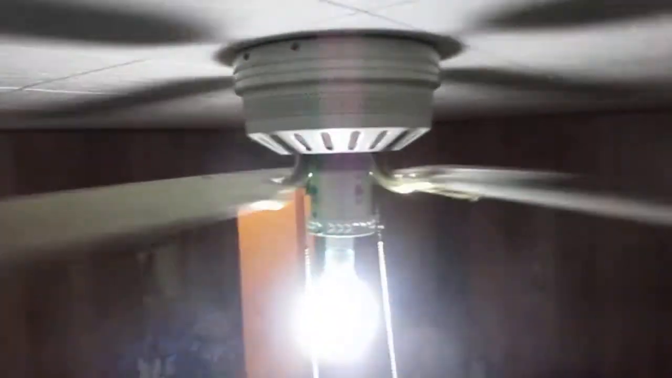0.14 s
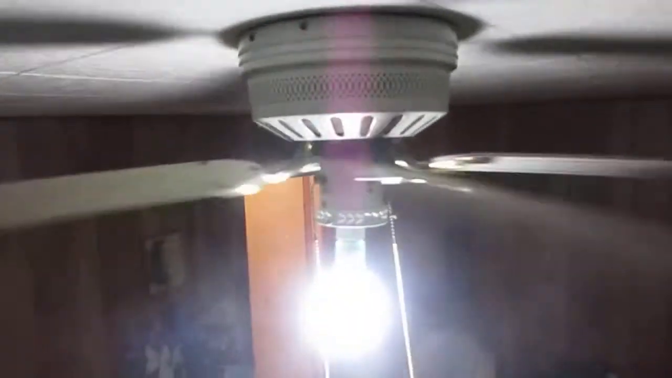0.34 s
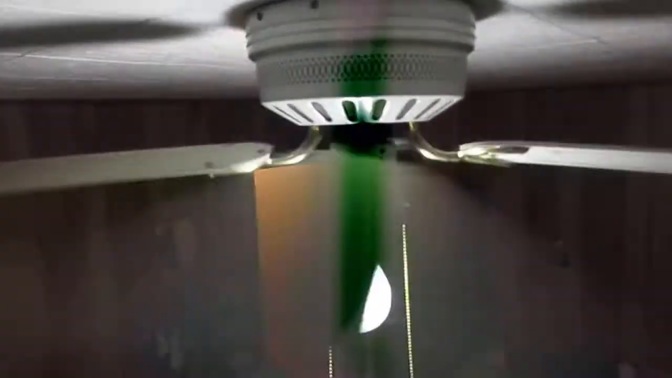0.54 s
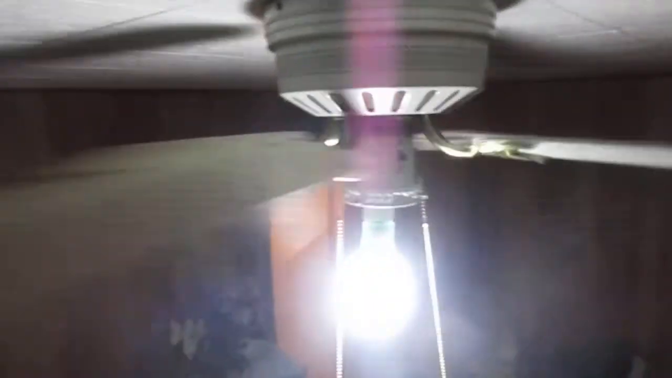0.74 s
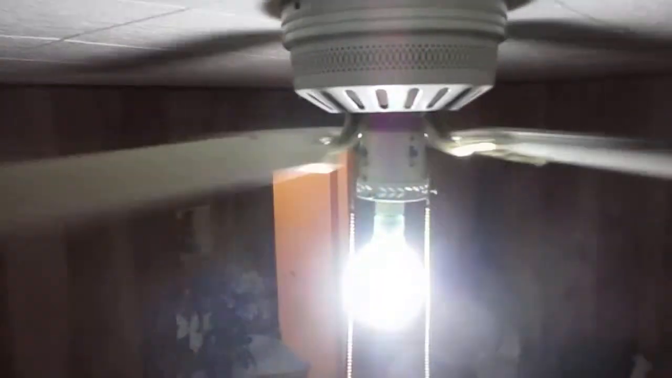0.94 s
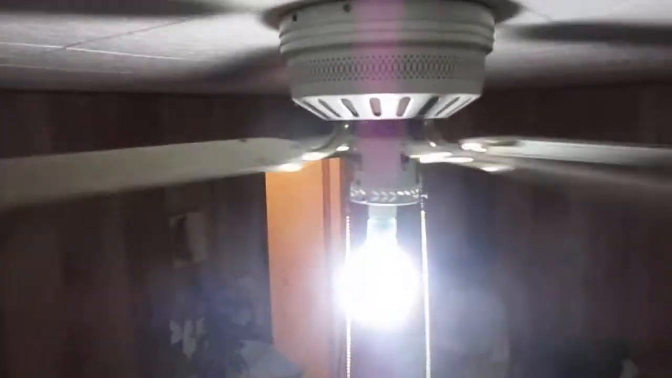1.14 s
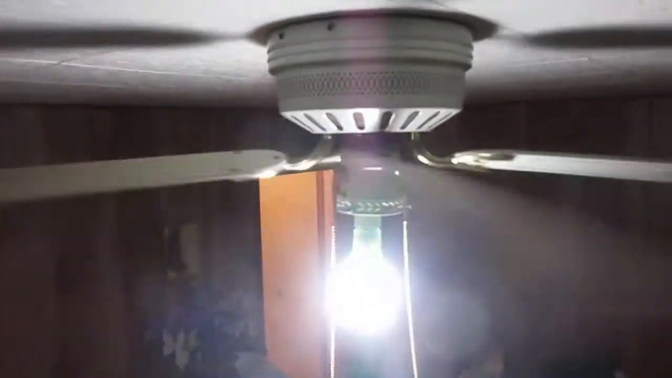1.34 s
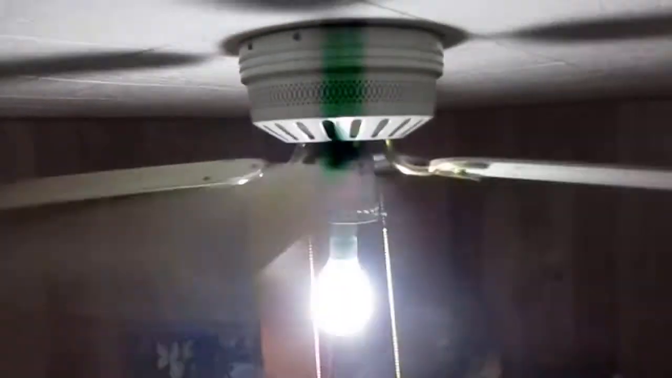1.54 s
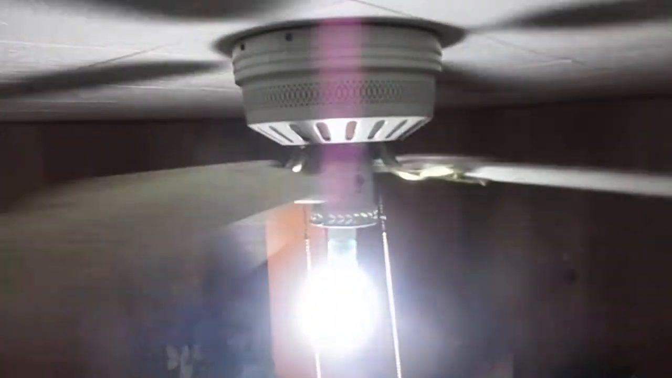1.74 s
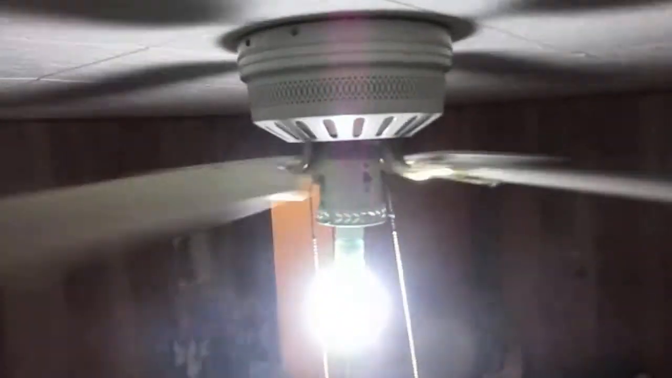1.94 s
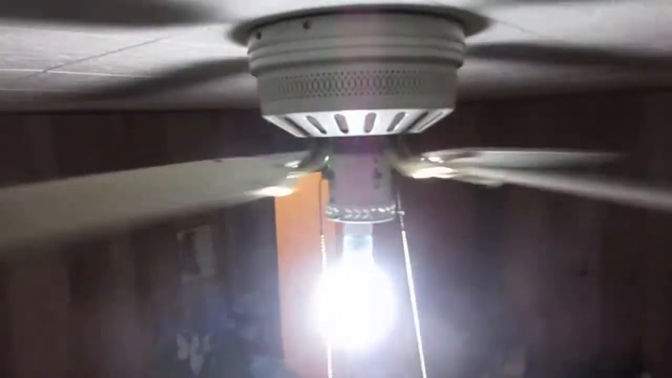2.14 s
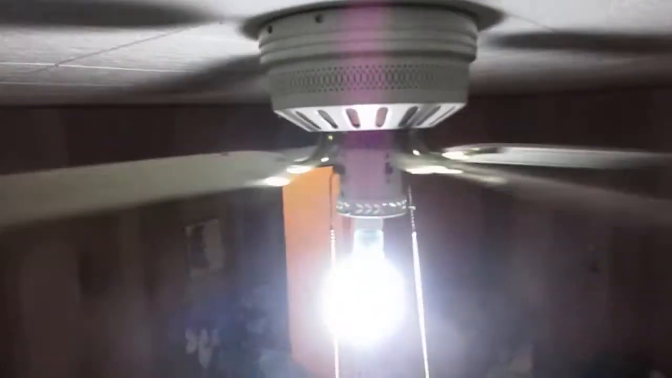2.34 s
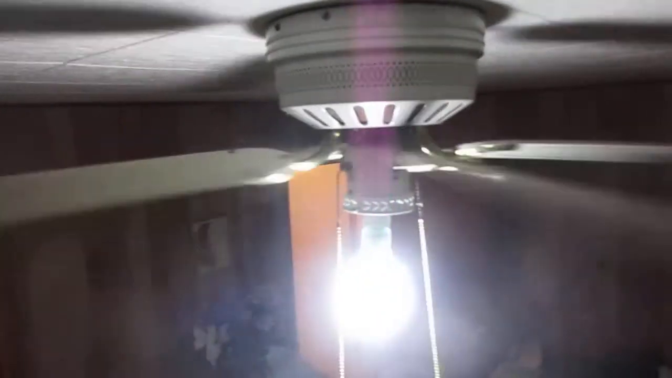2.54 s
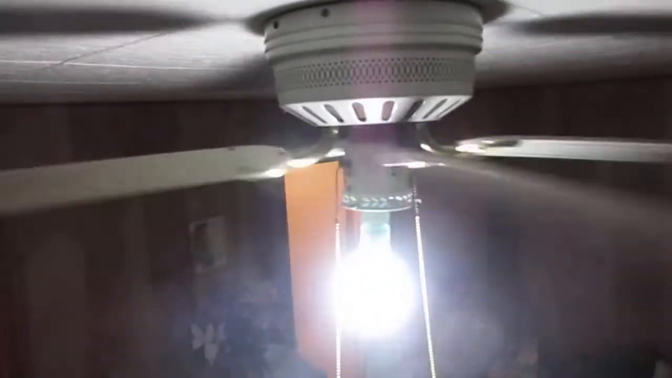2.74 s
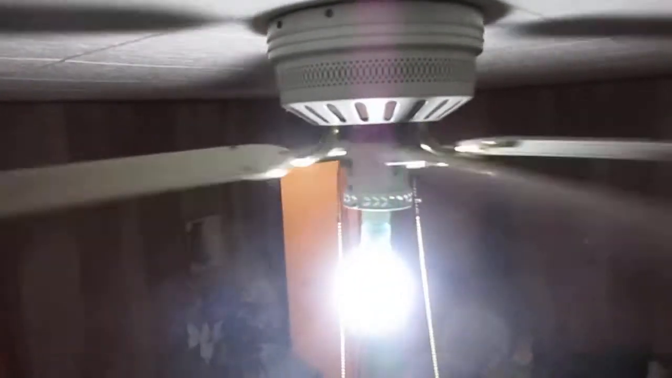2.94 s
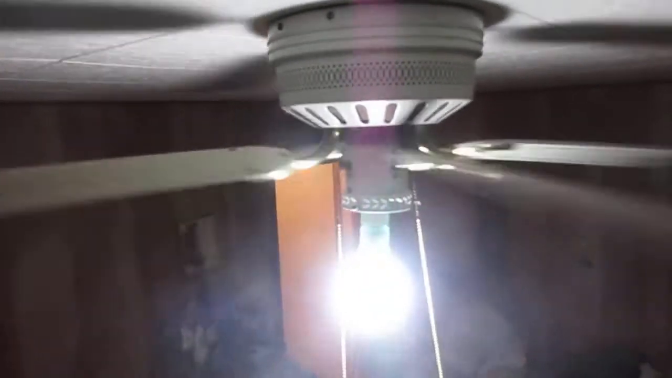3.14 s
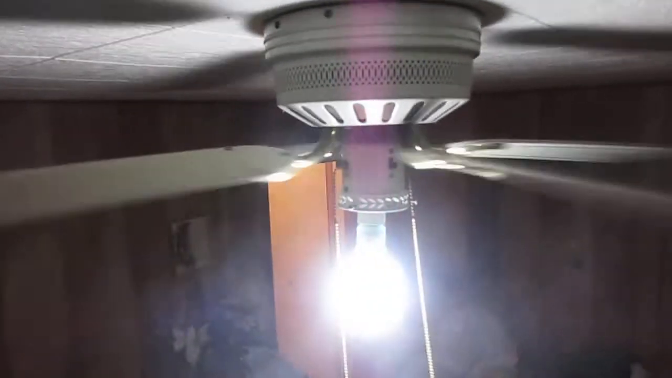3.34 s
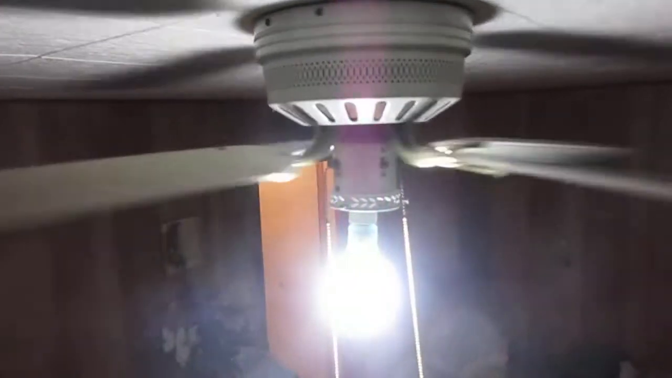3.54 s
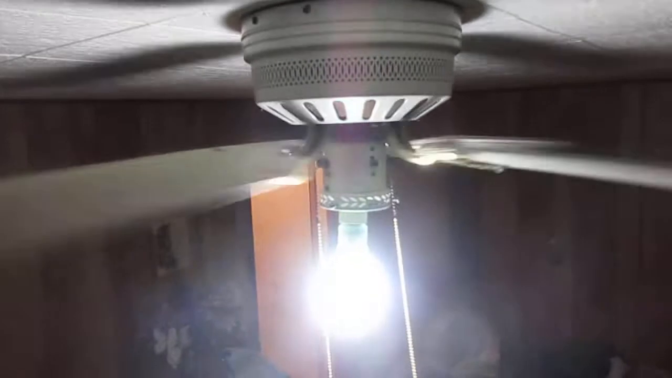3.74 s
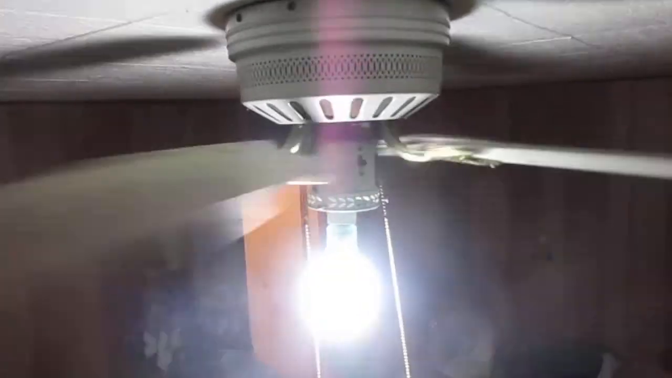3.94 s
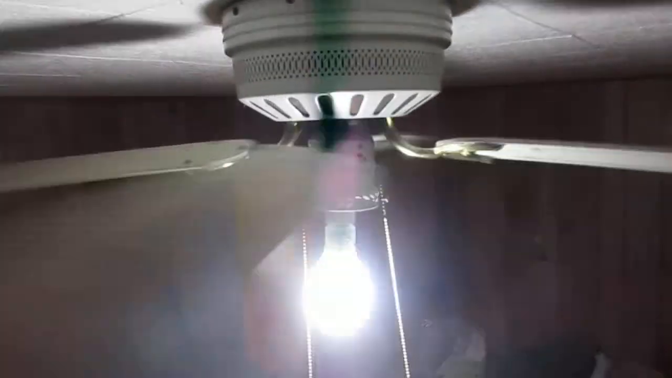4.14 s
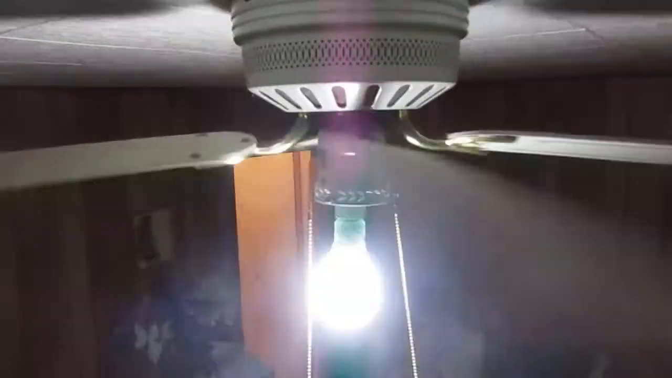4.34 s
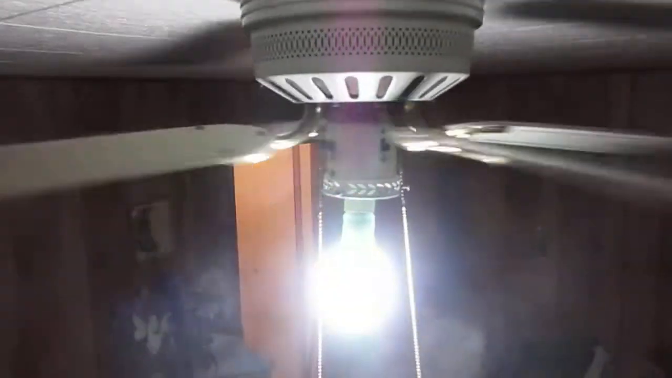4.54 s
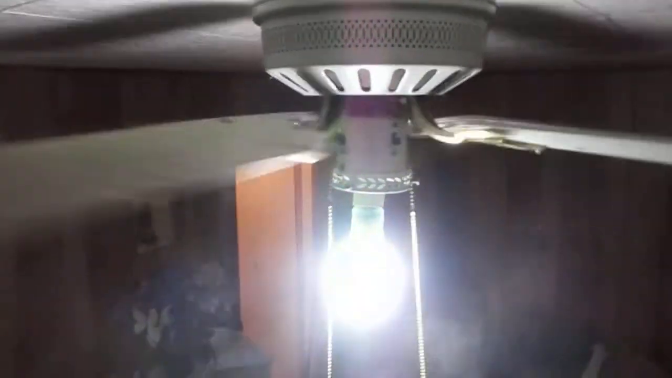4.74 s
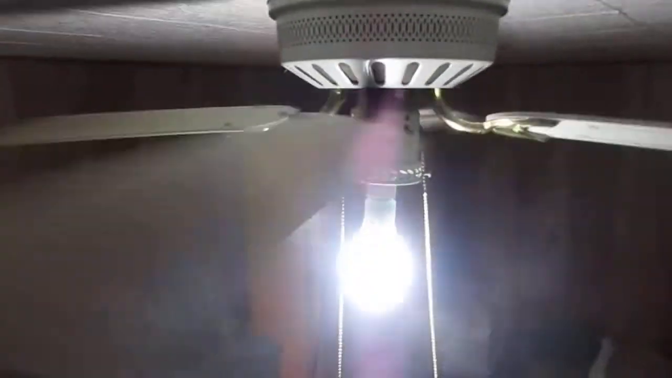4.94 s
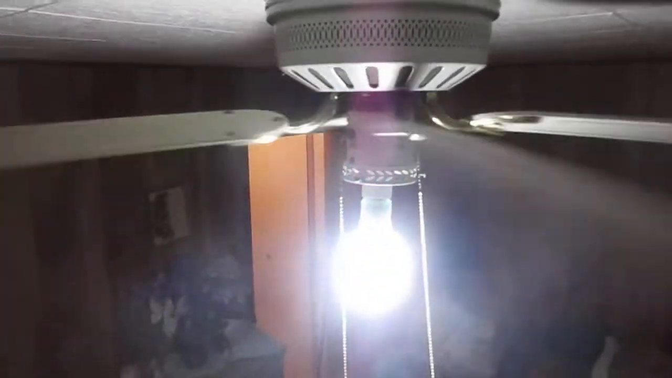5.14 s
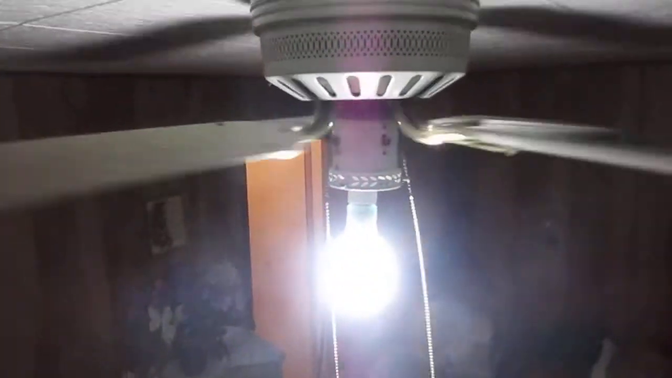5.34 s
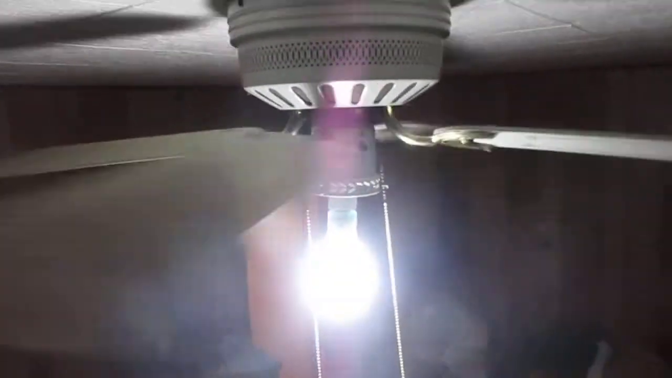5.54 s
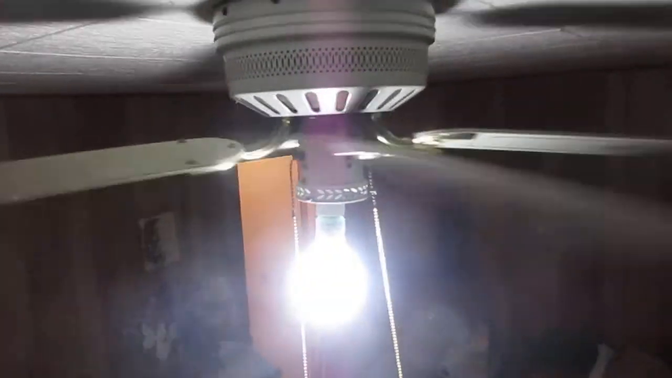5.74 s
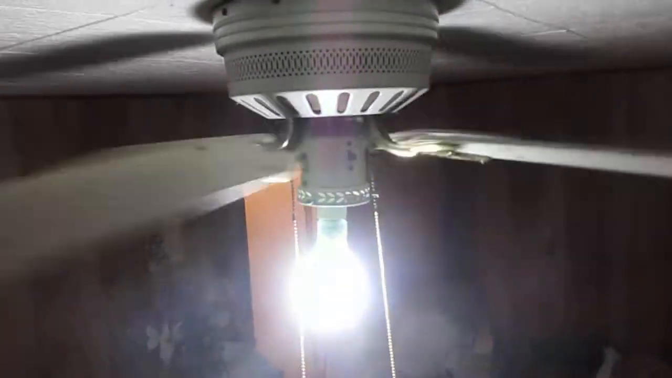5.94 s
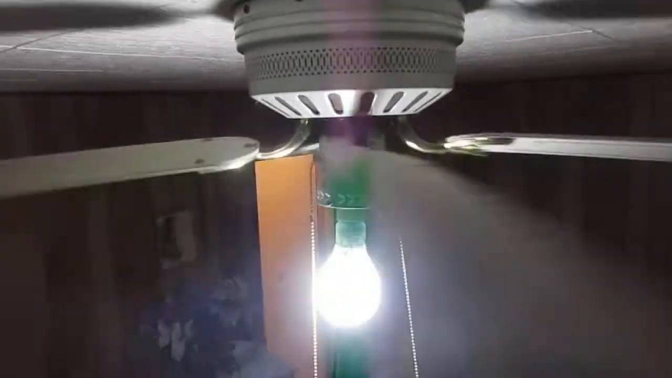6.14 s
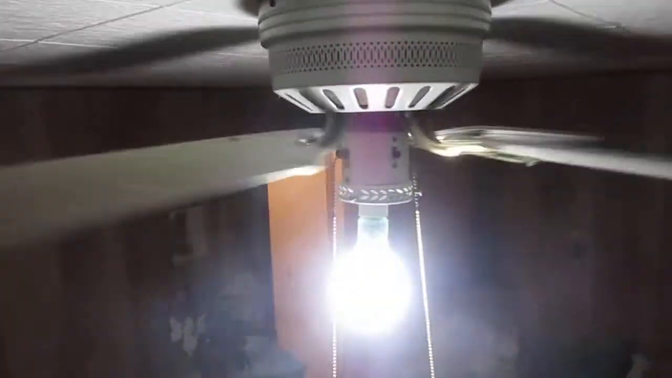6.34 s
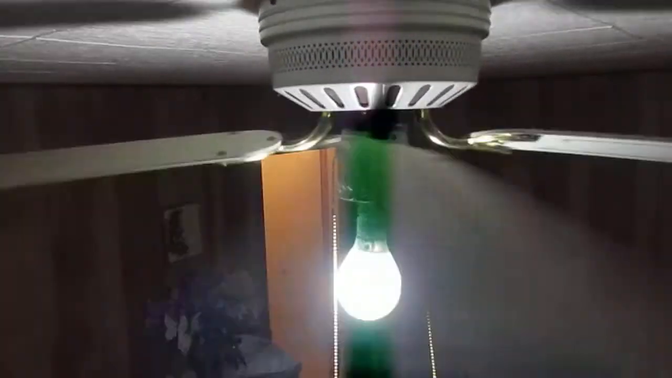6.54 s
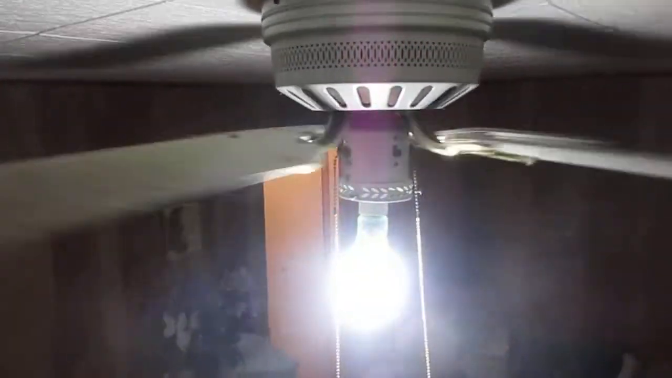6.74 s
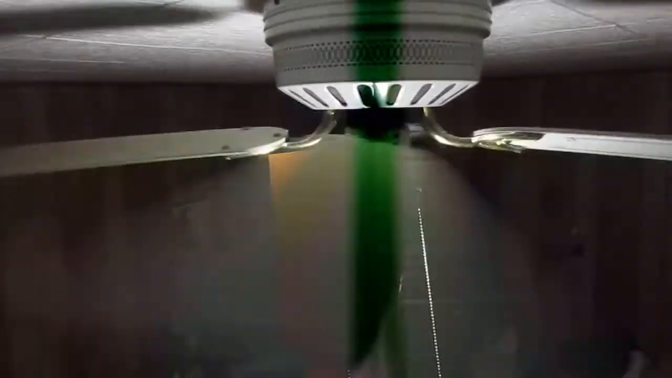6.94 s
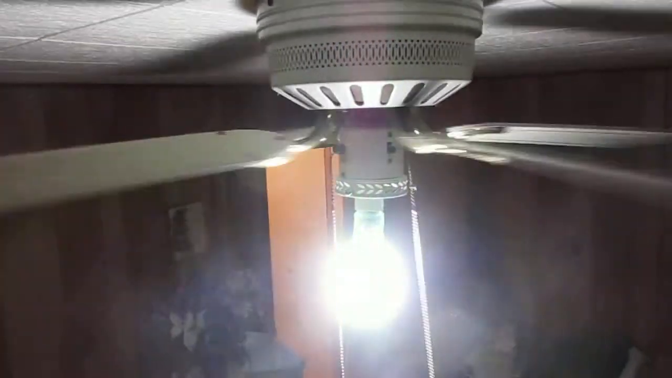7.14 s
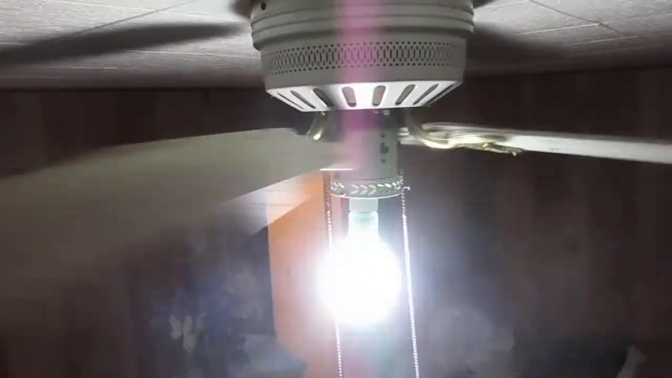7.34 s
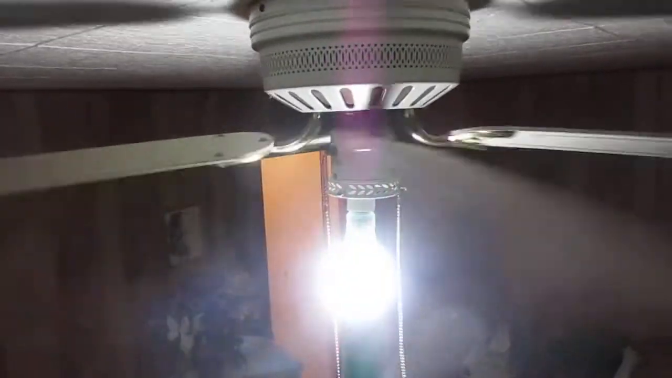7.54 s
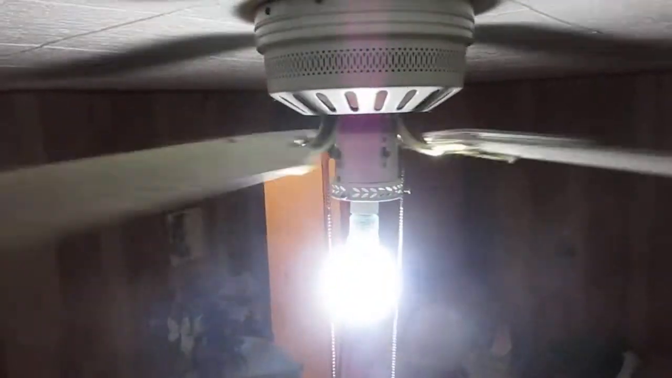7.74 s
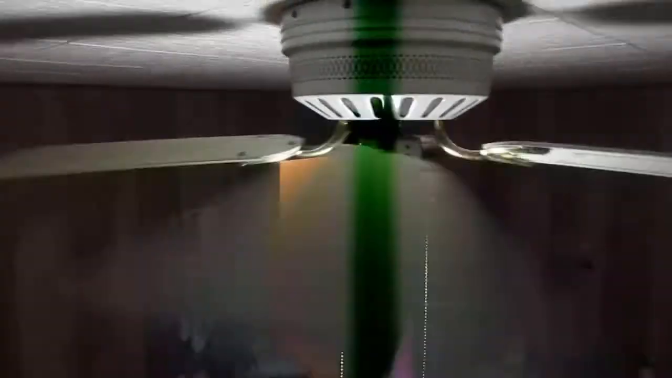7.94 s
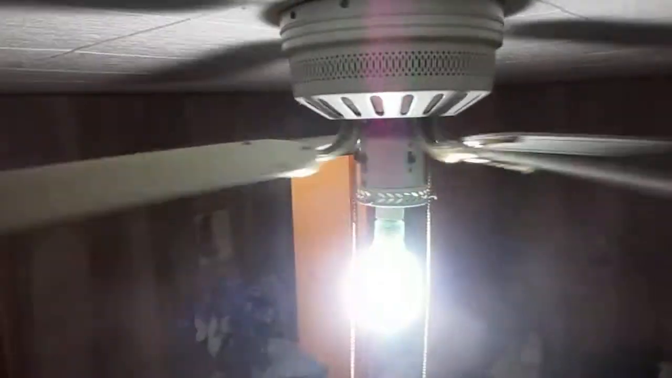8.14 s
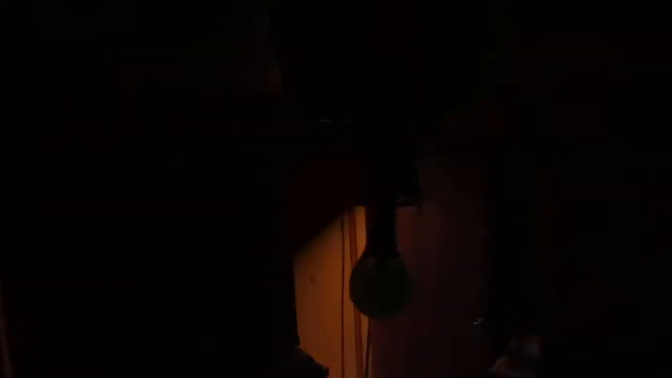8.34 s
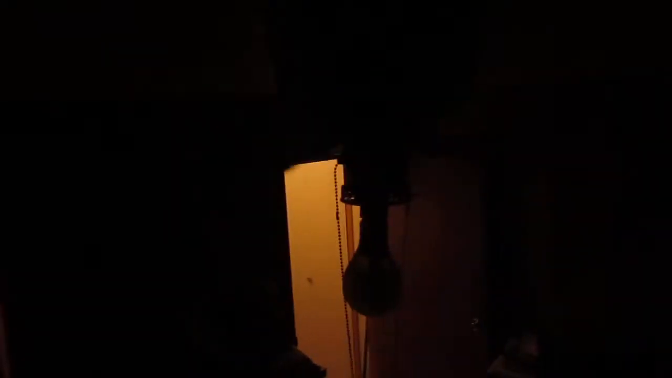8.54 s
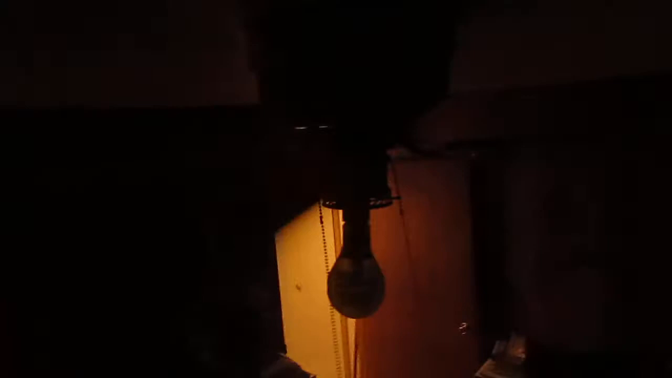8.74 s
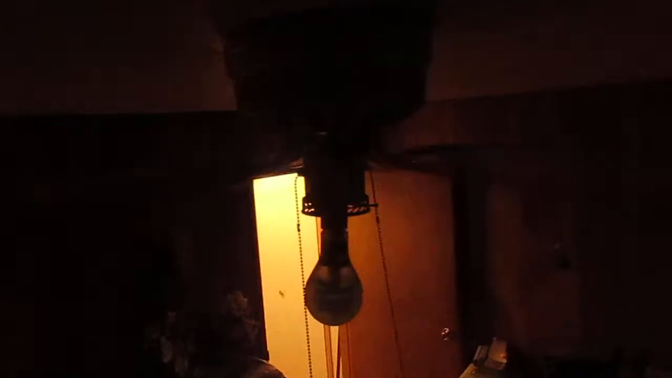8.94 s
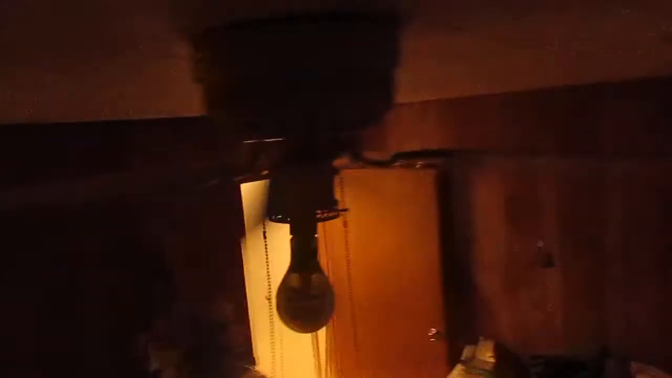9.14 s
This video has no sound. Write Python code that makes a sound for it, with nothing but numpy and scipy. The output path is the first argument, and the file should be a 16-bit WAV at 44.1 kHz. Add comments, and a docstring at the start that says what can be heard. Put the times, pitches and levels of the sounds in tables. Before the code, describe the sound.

A ceiling fan hums low with soft pulsing air while its pull chain is yanked repeatedly, each tug a rattling clunk then a sharp snap.

```python
"""Ceiling fan with pull chains

A ceiling fan hums in a small bedroom and slowly loses speed: mains harmonics sound over pulsed air noise.
Each pull drags the switch over with a rattling clunk, made of noise bursts, housing modes and a low thump.
On release the chain ticks back and the spring snaps home, as bursts that feed narrow resonances.
The hum all but stops for two seconds, and a swinging chain now and then pings the bulb's glass modes."""
import sys
import numpy as np
from scipy import signal
from scipy.fft import rfft, irfft
from scipy.io import wavfile
from scipy.ndimage import uniform_filter1d

SR = 44100
rng = np.random.default_rng(int(sys.argv[2]) if len(sys.argv) > 2 else 0)


def output_pcm(signal):
    """Save a mono or channel-first signal as 16-bit PCM at the path in sys.argv[1].

    Samples are clipped to [-1, 1] before scaling.
    """
    pcm = np.clip(np.atleast_2d(signal).T, -1, 1) * 32767
    wavfile.write(sys.argv[1], SR, np.round(pcm).astype(np.int16))


N = 404397
TIME = np.arange(N) / SR
RING = np.arange(SR * 3 // 4) / SR  # time axis of a single event, s

MAINS_HZ = 60
BLADE_COUNT = 4
# Harmonics of the winding hum: multiple of the mains, relative level/dB
HUM_HARMONICS = [(1, -17.5), (2, -1), (3, -24.5), (4, -15.5), (6, -35.5)]
# Motor switch positions: t/s, hum level from then on/dB
MOTOR_SETTINGS = [(0, -36.5), (4.68, -60), (6.59, -43), (6.99, -37.5)]
# Slowing rotor: t/s, blade passing rate/Hz
PASSING_RATE = [(0.0, 11.06), (1.97, 10.6), (6.1, 7.75), (6.41, 7.7), (9.17, 6.4)]
# Spectrum of the air rush: f/Hz, relative level per Hz/dB
RUSH_SPECTRUM = [(20, -11), (45, 3.5), (100, 2), (200, -1), (320, -4), (500, -11), (1000, -18.5),
                 (2500, -47)]
# Air levels at the reference passing rate, and their gain for each doubling of it
REFERENCE_PASSES_PER_S = 10.78
PUFF_DB, PUFF_DB_PER_DOUBLING = -44, 19
RUSH_DB, RUSH_DB_PER_DOUBLING = -40, 18

# Switch pulled over: t/s, level/dB, housing thump level/dB, run-up/s, cup knock level/dB
PULLS = [(.3350, -11.5, -20.5, 0.01, -28.5), (0.6453, -19.5, -21, 0.0096, -29),
         (2.1764, -12, -22, 0.0097, -19), (4.6392, -11.5, -20.5, 0.00822, -21),
         (6.5897, -12.5, -23, 0.0099, -26), (6.992, -12, -20.5, 0.0094, -21),
         (7.3258, -14, -22.5, 0.00992, -18), (8.1830, -16, -24, .004, -34)]
# Spectrum of the pull contact: f/Hz, relative level per Hz/dB
PULL_SPECTRUM = [(150, -13), (490, -19), (625, 6.5), (760, 1), (1150, -1.5), (1400, -10), (1570, -0.5),
                 (2150, -8), (3000, -9), (4000, -17.5), (5300, -11.5), (9000, -14), (13000, -18),
                 (16000, -41)]
# Modes of the housing: f/Hz, relative level/dB, t60/s
HOUSING_MODES = [(1020, -15, 0.096), (1187, -3.5, 0.27), (1256, -10.5, 0.61), (1529, 2, 0.12),
                 (1578, -7, 0.3), (1602, -2.5, 0.12), (1850, -16, .14), (1960, -28, 0.068),
                 (2155, -3, 0.055), (2835, -7.5, 0.12), (3030, -14, 0.29), (5140, -4, 0.14)]
# Spectrum of the mount and ceiling: f/Hz, relative level per Hz/dB
THUMP_SPECTRUM = [(15, -21), (30, 7.5), (48, 6.5), (72, -1), (140, -1), (195, -4.5), (300, -11),
                  (450, -15.5), (900, -41.5)]

# Spring snaps home: t/s, level/dB, crack f/Hz, crack level re snap/dB,
# spring f/Hz, spring level/dB, bead interval/s
SNAPS = [(0.8148, -12.5, 5760, -5, 2900, -26.5, .016), (2.4017, -12, 7650, -10, 3390, -23.5, .0213),
         (4.9471, -12.5, 8650, -10, 5200, -29, .037), (6.7990, -10.5, 8660, -12.5, 3070, -22.5, .0202),
         (7.174, -12.5, 9000, -2, 2900, -24, .019), (7.4910, -12, 5870, -9, 3130, -19.5, 0.018),
         (8.1830, -12, 2240, -6, 5030, -28, 0.02), (8.3755, -21, 2050, 4, 2310, -44, .0225)]
# Spectrum of the snap contact: f/Hz, relative level per Hz/dB
SNAP_SPECTRUM = [(150, -57), (470, -15.5), (600, 10.5), (850, 2.5), (1250, 5), (2200, -2.5), (3000, -2),
                 (4400, -5), (5400, 0.5), (7000, -4), (8700, 3), (11000, -6.5), (14000, -9.5), (16500, -18)]

# Beads caught as the chain tightens: t ahead of the clunk/s, level re the clunk/dB
TIGHTENING_BEADS = [(.06, -28.5), (.023, -18)]
# Single chain ticks: t/s, level/dB
LOOSE_TICKS = [(0.4734, -26), (0.5015, -24), (8.179, -21), (8.278, -33.5), (8.4017, -25.5)]
# Spectrum of the bead contact: f/Hz, relative level per Hz/dB
TICK_SPECTRUM = [(200, -11), (600, 9), (1200, 9.5), (1650, 6), (2500, 0.5), (4200, -1.5), (5300, 5.5),
                 (6200, 1.5), (8000, 4.5), (9000, 8.5), (9900, -9), (11000, 7), (13500, -7.5), (16500, -15)]
# Beads returning ahead of each snap: the last is loudest, and longer bead intervals are softer
RETURN_BEADS = 2
RETURN_DB, EARLIER_BEAD_DB, SLOW_RUN_DB_PER_S = -18.5, -1.5, -240

# Chain touches the bulb: t/s, level/dB
PINGS = [(1.5012, -38), (3.2578, -38), (5.102, -43), (8.5612, -30)]
# Modes of the bulb glass: f/Hz, relative level/dB, t60/s
BULB_MODES = [(6508, -13, .15), (9100, -14, .08), (10960, -4, .11), (11130, 1, 0.12), (11600, -8, .08),
              (12420, -5, .12), (12900, -6, .08), (13570, -3, .13), (14300, -10, .08), (15210, -9, .12)]
REBOUND_S, REBOUND_DB = .17, -57

# Something loose ticks to and fro: t/s, level/dB, f/Hz
RATTLES = [(2.775, -41, 1750), (3.020, -43, 2950), (5.580, -52, 3000), (5.857, -48, 3000),
           (7.900, -47, 3020)]
RATTLE_BACK_S, RATTLE_BACK_DB = 0.037, -3

# Steady tones in the room: f/Hz, level/dB
ROOM_TONES = [(177.3, -52), (360.5, -58), (587, -62), (1497, -64.5), (15750, -96)]
# Spectrum of the room noise: f/Hz, relative level per Hz/dB
FLOOR_SPECTRUM = [(20, 0.5), (60, 1), (200, -1), (450, -8), (800, -7), (1350, -12.5), (1510, -10),
                  (1700, -14.5), (2400, -20.5), (4500, -26.5), (7200, -29), (7700, -22), (9200, -30.5),
                  (16000, -43.5)]
FLOOR_DB = -44.5
# Reverberation of the bedroom: f/Hz, t60/s, relative echo level/dB
REVERBERATION = [(200, 0.23, -14), (606, 0.27, -6), (1420, 0.31, -4), (3030, 0.31, -0.5),
                 (5440, 0.28, -6.5), (9000, 0.22, -11.5), (15000, 0.19, -7.5)]
EDGE_HZ = 16100  # upper band limit


def motor(waver_db=0.83, flutter_db=1.0, wobble_db=1.5, wobble_turn=0.34, switch_s=0.055):
    """Magnetic hum: windings sound at mains harmonics, and the rotor's wobble swells them once a turn."""
    starts, levels_db = np.transpose(MOTOR_SETTINGS)
    setting = np.searchsorted(starts[1:], TIME)
    current = uniform_filter1d(gain_of(levels_db[setting]), int(switch_s * SR))
    rate, = follow(PASSING_RATE)
    turns = np.cumsum(rate) / SR / BLADE_COUNT
    wobble = np.cos(2 * np.pi * (turns + wobble_turn))
    harmonics = np.zeros(N)
    for multiple, db in HUM_HARMONICS:
        level = gain_of(db + waver_db * drift(6.6))
        harmonics += level * np.sin(2 * np.pi * (multiple * MAINS_HZ * TIME + rng.random()))
    swell = gain_of(wobble_db * wobble + flutter_db * drift(10))
    return np.sqrt(2) * current * swell * harmonics


def blades(puff_hz=39, puff_s=0.021, swish=0.25, uneven_db=0.7, stray=0.064, eddy_db=0.8):
    """Aerodynamic noise: each blade pushes a puff and swells the rush; both weaken with rotor speed."""
    rate, = follow(PASSING_RATE)
    doublings = np.log2(rate / REFERENCE_PASSES_PER_S)
    puff_db = PUFF_DB + PUFF_DB_PER_DOUBLING * doublings
    rush_db = RUSH_DB + RUSH_DB_PER_DOUBLING * doublings
    passes = np.cumsum(rate) / SR + stray * drift(2.5)
    offset = passes - np.round(passes)  # distance from the nearest pass, in passes
    since = offset / rate
    bell = np.exp(-.5 * (since / puff_s) ** 2)
    puffs = bell * np.cos(2 * np.pi * puff_hz * since) * np.cos(np.pi * offset)
    rush = noise(RUSH_SPECTRUM) * (1 + swish * np.cos(2 * np.pi * passes))
    # eddies make both parts uneven
    uneven_puffs = gain_of(puff_db + uneven_db * drift(5)) * evened(puffs - puffs.mean())
    return uneven_puffs + gain_of(rush_db + eddy_db * drift(18)) * rush


def pulls(scrape_db=-3.5, drop_db=-3, settle_s=0.0052, ring_db=-18, grit=0.51, cup_hz=630, cup_width_hz=70):
    """Friction and impact: the cam scrapes to its crest, drops, and rings the housing and hollow cup."""
    force, body = np.zeros((2, N))
    lead_s = .05  # length of scrape kept ahead of the drop
    t = RING - lead_s
    for s, db, _, run_up_s, cup_db in PULLS:
        grains = rng.standard_normal(len(t))
        roughness = np.repeat(rng.standard_normal(len(t)), 32)[:len(t)]
        grains = grains * np.exp(grit * roughness - grit ** 2)
        swell = np.exp(-abs(t) / np.where(t < 0, run_up_s, settle_s))
        add(force, s - lead_s, gain_of(db + scrape_db) * swell * grains)
        add(force, s, gain_of(db + drop_db) * contact(t60=0.028))
        add(body, s, gain_of(db + ring_db) * ring(HOUSING_MODES))
        knock = resonate(contact(t60=0.021), cup_hz, cup_width_hz)
        add(body, s - run_up_s, gain_of(cup_db) * 2 * knock)
    return coloured(force, PULL_SPECTRUM) + body


def thumps(rise_s=0.0094, t60=0.31, early_s=.016, linger_db=-13, linger_t60=1.0):
    """Structure-borne sound: the tug shakes mount and ceiling, whose rumble decays at two rates."""
    out = np.zeros(N)
    decay = fade(t60) + gain_of(linger_db) * fade(linger_t60)
    shape = (1 - np.exp(-(RING / rise_s) ** 2)) * decay
    for s, _, db, *_ in PULLS:
        add(out, s - early_s, gain_of(db) * noise(THUMP_SPECTRUM, size=len(RING)) * shape)
    return out


def snaps(ring_db=-23, spring_t60=0.15, spring_width_hz=650, crack_width_hz=1150, spring_rise_s=0.0022):
    """Impact excitation: a hard crack, then noise in one band for the dense modes of the spring."""
    force, body = np.zeros((2, N))
    for s, db, crack_hz, crack_db, spring_hz, spring_db, _ in SNAPS:
        add(force, s, gain_of(db) * contact(t60=0.026))
        crack = resonate(contact(t60=0.01), crack_hz, crack_width_hz)
        add(body, s, gain_of(db + crack_db) * crack)
        spring = resonate(rng.standard_normal(len(RING)), spring_hz, spring_width_hz)
        shape = fade(spring_t60) * (1 - np.exp(-RING / spring_rise_s))
        add(body, s, gain_of(spring_db) * spring * shape / np.sqrt(2))
        add(body, s, gain_of(db + ring_db) * ring(HOUSING_MODES))
    return coloured(force, SNAP_SPECTRUM) + body


def beads():
    """Contact sequence: time and level of beads at the rim as the chain tightens, returns or ticks singly."""
    tightening = [(s - ahead_s, db + bead_db) for s, db, *_ in PULLS for ahead_s, bead_db in TIGHTENING_BEADS]
    returning = []
    for s, *_, gap_s in SNAPS:
        for k in range(RETURN_BEADS):  # k counts back from the last bead
            db = RETURN_DB + k * EARLIER_BEAD_DB + SLOW_RUN_DB_PER_S * gap_s
            returning.append((s - (k + 1) * gap_s, db))
    return tightening + returning + LOOSE_TICKS


def ticks(ring_db=-19, slide_db=-20, slide_s=0.04, rub_db=-8, rub_hz=1630, rub_width_hz=450):
    """Sliding impact: each bead slides at the rim, clicks over it and rubs on through the guide."""
    force, body = np.zeros((2, N))
    slide = np.hanning(int(slide_s * SR))
    for s, db in beads():
        add(force, s, gain_of(db) * contact(t60=0.012))
        add(force, s - slide_s / 2, gain_of(db + slide_db) * slide * rng.standard_normal(len(slide)))
        rub = resonate(contact(t60=0.067), rub_hz * rng.uniform(0.91, 1.04), rub_width_hz)
        add(body, s, gain_of(db + rub_db) * rub)
        add(body, s, gain_of(db + ring_db) * ring(HOUSING_MODES))
    return coloured(force, TICK_SPECTRUM) + body


def rubs(rub_db=-18, rub_hz=1640, rub_width_hz=260, grit=0.46):
    """Dry friction: gritty noise in one resonance while the chain runs back through its guide."""
    out = np.zeros(N)
    for s, db, *_, gap_s in SNAPS:
        run_s = (RETURN_BEADS + .5) * gap_s
        size = int(run_s * SR)
        grains = rng.standard_normal(size)
        grains = grains * np.exp(grit * np.repeat(rng.standard_normal(size), 128)[:size])
        rub = evened(resonate(grains, rub_hz, rub_width_hz)) * np.sqrt(np.hanning(size))
        add(out, s - run_s, gain_of(db + rub_db + SLOW_RUN_DB_PER_S * gap_s) * rub)
    return out


def pings(ring_db=-13):
    """Modal ringing: a bright tap excites thin glass, and the chain swings back for a fainter touch."""
    force, glass = np.zeros((2, N))
    rebounds = [(s + REBOUND_S, REBOUND_DB) for s, _ in PINGS]
    for s, db in PINGS + rebounds:
        add(force, s, gain_of(db) * contact(t60=0.018))
        add(glass, s, gain_of(db + ring_db) * ring(BULB_MODES))
    # spectrum of the tap: f/Hz, relative level per Hz/dB
    return coloured(force, [(2000, -42), (6500, -5), (9500, -3), (11300, 7), (16000, -7)]) + glass


def rattles(width_hz=700, stray_db=-52, stray_hz=3000, count=30):
    """Loose contact: something ticks faintly and falls back, among soft ticks at random times."""
    out = np.zeros(N)
    backs = [(s + RATTLE_BACK_S, db + RATTLE_BACK_DB, hz) for s, db, hz in RATTLES]
    strays = [(s, stray_db, stray_hz) for s in rng.uniform(0, TIME[-1], count)]
    for s, db, hz in RATTLES + backs + strays:
        add(out, s, gain_of(db) * resonate(contact(t60=0.027), hz, width_hz))
    return out


def background(waver=0.42):
    """Ambient sound: stationary coloured noise with tones that waver in level and phase (rad)."""
    tones = np.zeros(N)
    for hz, db in ROOM_TONES:
        level = gain_of(db + 0.66 * drift(8.3))
        tones += level * np.sin(2 * np.pi * hz * TIME + waver * drift(6.4))
    return gain_of(FLOOR_DB) * noise(FLOOR_SPECTRUM) + np.sqrt(2) * tones


def bedroom(x, count=3):
    """Time-varying reverberation: slow chance shifts the sound among several sets of echoes."""
    shares = np.array([drift(2) for _ in range(count)])
    shares /= np.linalg.norm(shares, axis=0)
    return x + sum(signal.oaconvolve(x * share, echoes())[:N] for share in shares)


def echoes(gap_s=.003):
    """Diffuse reflection: dense echoes from ceiling and walls, each band decaying at its own rate."""
    hz, t, z = signal.stft(rng.standard_normal(SR // 2), SR, nperseg=256)
    t60 = read(REVERBERATION, hz)[:, None]
    level = gain_of(read(REVERBERATION, hz, axis=2))[:, None]
    # the root evens out the energy of short and long decays
    z = z * fade(t60, t) * level * np.sqrt(2 * np.log(1000) / (t60 * SR))
    return np.r_[np.zeros(int(gap_s * SR)), signal.istft(z, SR, nperseg=256)[1]]


def contact(t60, size=2048):
    """Impact chatter: a short burst of nearly even spectrum, with the energy of 2 ms at rms one."""
    burst = rng.standard_normal(size) * fade(t60, RING[:size])
    for _ in range(3):  # flatten the spectrum, then restore the decay
        z = rfft(burst)
        burst = irfft(z / (abs(z) + 1e-9)) * fade(5 * t60, RING[:size])
    return burst / np.linalg.norm(burst) * np.sqrt(.002 * SR)


def ring(modes):
    """Modal superposition: decaying sines, each struck at a random phase."""
    total = np.zeros(len(RING))
    for hz, db, t60 in modes:
        total += gain_of(db) * fade(t60) * np.sin(2 * np.pi * (hz * RING + rng.random()))
    return total


def resonate(x, hz, width_hz):
    """Resonance: gathers the energy of a sound into one steep band."""
    band = signal.butter(2, [hz - width_hz / 2, hz + width_hz / 2], "band", fs=SR)
    out = signal.lfilter(*band, x)
    return out * np.linalg.norm(x) / np.linalg.norm(out)


def coloured(x, spectrum, size=2048):
    """Minimum-phase filtering: a causal filter of unit energy keeps attacks sharp."""
    log_gain = np.log(gain_of(read(spectrum, abs(np.fft.fftfreq(size, 1 / SR)))))
    response = np.exp(np.conj(signal.hilbert(log_gain)))
    taps = np.fft.ifft(response).real[:size // 2]
    return signal.oaconvolve(x, taps / np.linalg.norm(taps))[:N]


def noise(spectrum, size=N):
    """Spectral shaping: random noise of the given colour, rms one."""
    gain = gain_of(read(spectrum, np.fft.rfftfreq(size, 1 / SR)))
    return evened(irfft(rfft(rng.standard_normal(size)) * gain, size))


def drift(hz):
    """Slow fluctuation: a sum of sines at rates up to hz with random phases, rms one."""
    rates = hz * np.geomspace(.1, 1, 12)[:, None]
    t = np.linspace(0, TIME[-1], 1000)
    sines = np.sin(2 * np.pi * (rates * t + rng.random(rates.shape)))
    return evened(np.interp(TIME, t, sines.sum(0)))


def fade(t60, t=RING):
    """Exponential decay: falls 60 dB in t60 seconds."""
    return np.exp(-np.log(1000) * t / t60)


def gain_of(db):
    """Level law: decibels to amplitude."""
    return 10 ** (np.asarray(db) / 20)


def evened(x):
    """Normalisation: scales to an rms of one."""
    return x / np.sqrt(np.mean(x ** 2) + 1e-20)


def read(points, hz, axis=1):
    """Interpolation: reads one column of a table along log frequency."""
    columns = np.transpose(points)
    return np.interp(np.log(hz + 1), np.log(columns[0] + 1), columns[axis])


def follow(rows):
    """Interpolation: every column of a curve, sample by sample."""
    s, *columns = np.transpose(rows)
    return [np.interp(TIME, s, c) for c in columns]


def add(mix, s, sound):
    """Superposition: mixes a sound in at s seconds."""
    part = mix[max(round(s * SR), 0):][:len(sound)]
    part += sound[:len(part)]


def scene():
    """Superposition: the switch and chain sounds excite the room echoes, the other layers add directly."""
    direct = motor() + blades() + background() + thumps() + rattles()
    switch = pulls() + snaps() + ticks() + rubs() + pings()
    return (direct + bedroom(switch))[None]


def record(dry, notch_hz=7900, notch_q=22):
    """Linear filtering: the microphone has one narrow treble notch, followed by a band limit."""
    notched = signal.lfilter(*signal.iirnotch(notch_hz, notch_q, SR), dry)
    lowpass = signal.firwin(255, EDGE_HZ, window=("kaiser", 9), fs=SR)
    return signal.oaconvolve(notched, lowpass[None], "same")


dry = scene()
out = record(dry)
output_pcm(out)
```